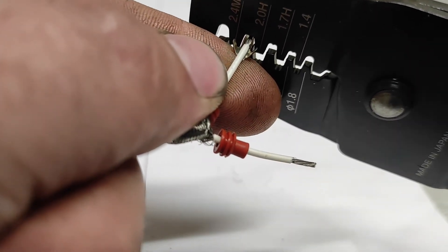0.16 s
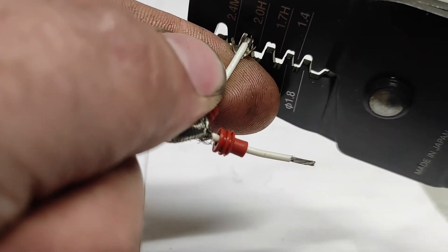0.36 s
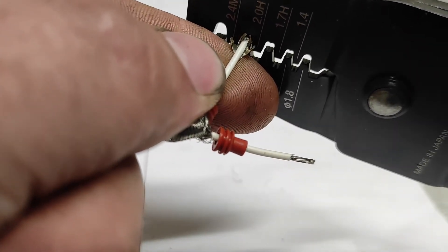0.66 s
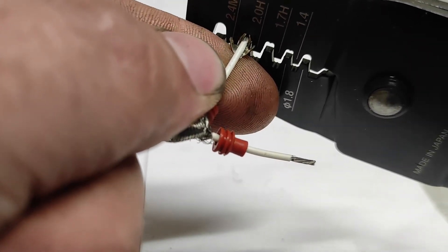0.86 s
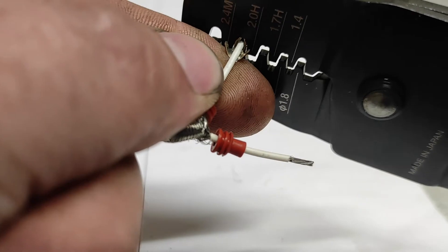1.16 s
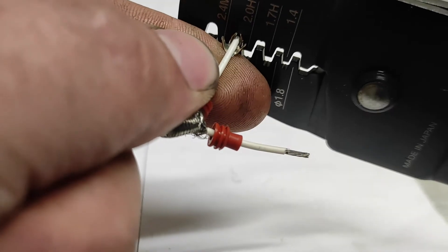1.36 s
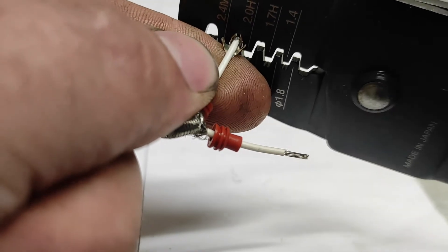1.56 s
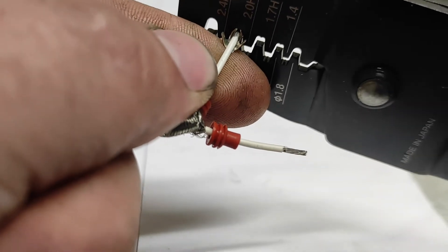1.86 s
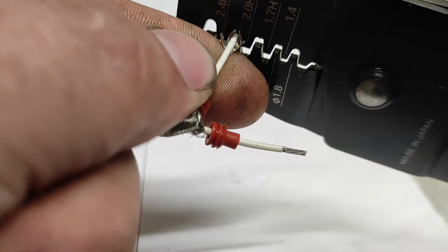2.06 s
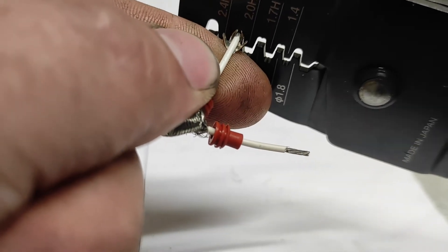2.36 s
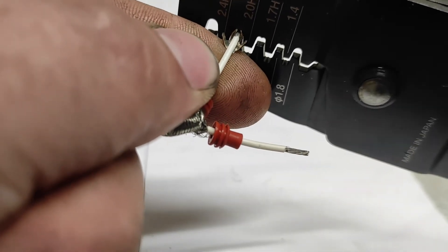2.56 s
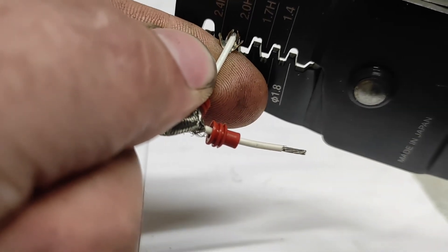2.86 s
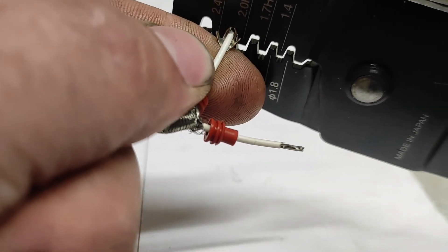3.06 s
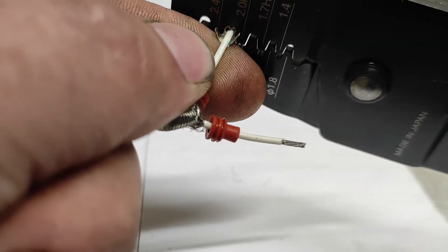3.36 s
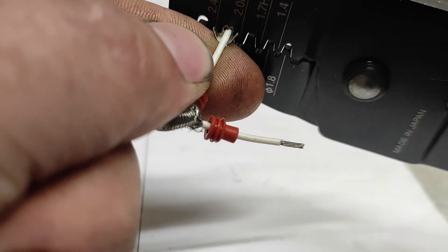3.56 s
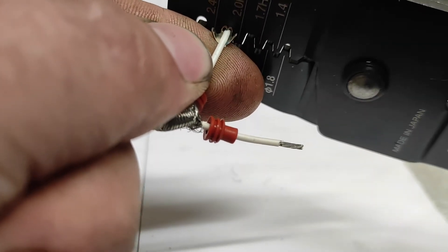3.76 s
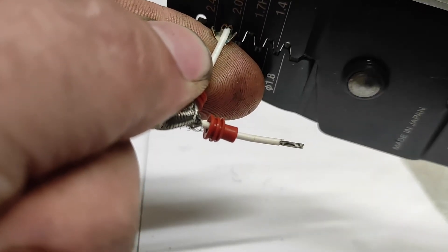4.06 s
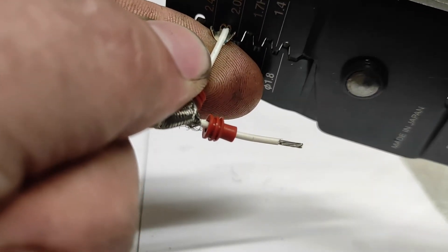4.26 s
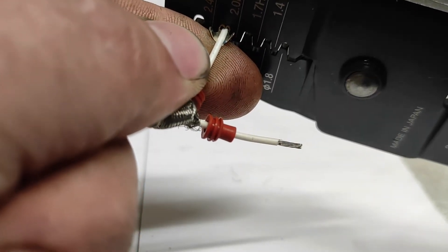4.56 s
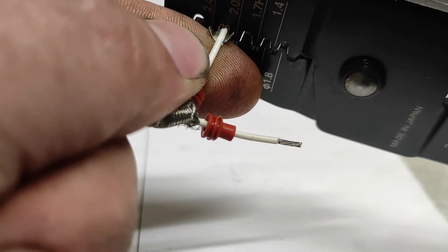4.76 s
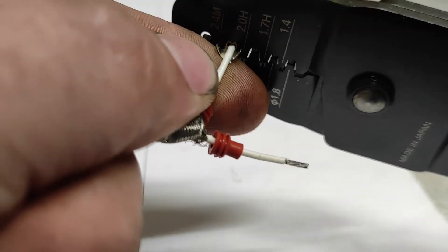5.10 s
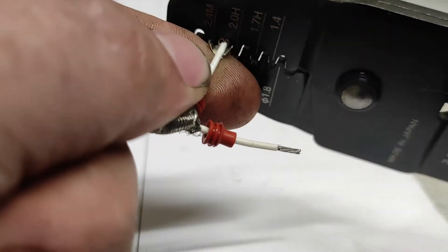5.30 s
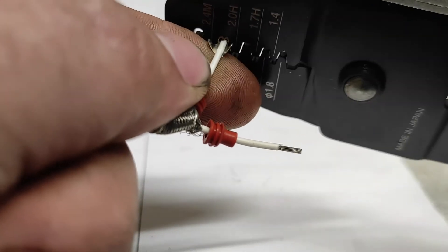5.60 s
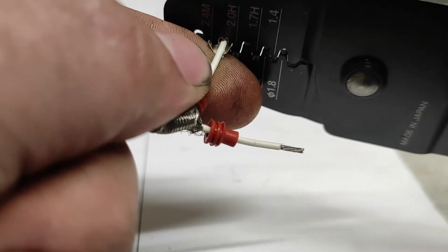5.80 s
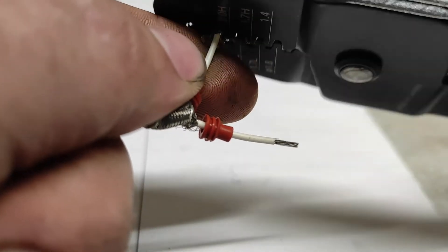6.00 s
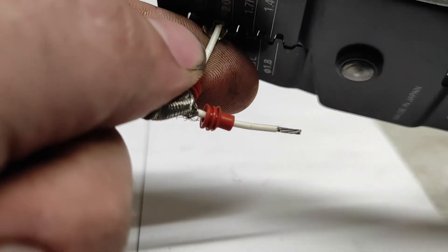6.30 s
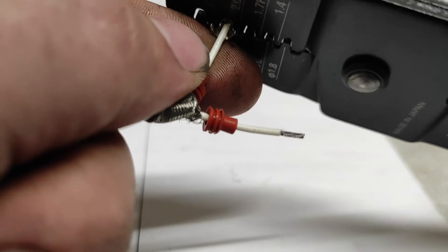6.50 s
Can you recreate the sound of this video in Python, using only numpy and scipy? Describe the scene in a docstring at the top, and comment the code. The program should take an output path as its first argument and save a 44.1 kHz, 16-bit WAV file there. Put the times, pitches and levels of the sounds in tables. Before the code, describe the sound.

A crimping tool squeezed in the fingers near a stereo microphone resting on the bench: light metallic clicking, a single dominant sharp crack with a dull knock mostly at left, near stillness, then rapid clicks and dry skin scuffs on steel. The room tail is short. Faint mains hum, low rumble and a wavering engine-like drone grow slightly underneath.

```python
"""Crimping tool on a workshop bench

Close up: a hand crimping tool ticks, snaps shut on a wire terminal and shifts in the fingers. Each contact is a
short noise burst that rings decaying modes of jaws, pivot, handle and bench and wakes the small room.
Harder blows thump through the bench, mostly into the left microphone; skin and steel rub as shaped noise.
Behind: mains hum and a wavering drone as sines, distant traffic, rumble and hiss as noise.
The camera stands on the bench; each of its two microphone ports has its own resonance."""
import sys
import numpy as np
from scipy import signal
from scipy.fft import rfft, irfft, next_fast_len
from scipy.io import wavfile
from scipy.ndimage import map_coordinates

SR = 44100
rng = np.random.default_rng(int(sys.argv[2]) if len(sys.argv) > 2 else 0)


def digitize_waveform(pressure):
    """Quantize a signal to 16-bit integers and store it at the path in sys.argv[1].

    Rows of a 2-D input are taken as channels; values are limited to [-1, 1].
    """
    field = np.atleast_2d(pressure).T
    bounded = np.clip(field, -1, 1)
    quanta = np.round(bounded * 32767).astype(np.int16)
    wavfile.write(sys.argv[1], SR, quanta)


N = 292824
T = np.arange(N) / SR

# Contacts of the tool: (time [s], strength [dB], then relative to the strength: jaws [dB], pivot [dB],
# extra on the pinging plate [dB], handle knock [dB], extra on the handle's lowest mode as the grip
# lets it ring [dB], blow into the bench [dB]; last, left above right [dB])
CONTACTS = [(0.3321, -52.5, -3, -3, 14, 0, 4.5, -4, 3), (0.408, -41, -9, -9.5, -1, -11.5, -5, -4.5, 0.5),
            (0.8641, -35, -34, -21.5, 3, -8, 1, -15.5, 3.5),
            (1.0621, -36, -10.5, -9.5, -7, -5, 4, -15, -7.5), (1.1368, -47, -14, -15, 0, -7.5, 3, -6, -1),
            (1.1731, -43.5, -8.5, -7.5, 6, 0, 3, -9.5, -4), (1.214, -48, -10.5, -8, 0, -5.5, -1, -28, 5),
            (1.256, -60, -6, -11, 2, 3.5, 7, 1.5, 2), (1.3278, -46.5, -14, -13, 8, -16.5, 2, -13, 1),
            (1.439, -66, -12, -10, 0, 9.5, 4, 12, 2), (1.547, -35, -11.5, -9.5, -6, -34, -3, -26.5, -6),
            (1.8684, -55.5, -6, -4, 6, 0.5, 5, 0.5, 6), (2.2596, -52.5, -15, -20, 2, -23, 0, -17, -4),
            (2.5437, -53, -9, -7, 5, -18, -9, -6.5, 2), (3.13, -12, 0.5, -2.5, 3, -15.5, -4.5, -15.5, 2.5),
            (3.225, -55, 4, -10, -3, 7, -6, 9.5, 0), (3.2916, -39.5, -30.5, -17.5, -0.5, -14, 5, -8, 2),
            (3.536, -55, -5, 2, 5.5, -3, -5, -3, -3), (3.595, -62, -4, 1, 10, -21, -3, -14, 0.5),
            (3.8044, -45.5, -8.5, -10, 7, -2.5, -7, -14, -4),
            (4.1371, -49.5, -2.5, 2, 9.5, 3.5, -5, -14, -0.5),
            (4.26, -45.5, -8.5, -6, 8, -19.5, 4, -15, -1),
            (5.0675, -43, -14, -13.5, 3, -15.5, -5.5, -15.5, 1.5),
            (5.095, -50, -12.5, -6, 6, -17, -5, -20, -2), (5.184, -49.5, -12, -9, 0, -11, 3, -8, 2),
            (5.212, -49, -12, -6, -2, -23, -3, -30, -3), (5.2914, -34.5, -10.5, -11.5, 3, -17, -1, -38, -6),
            (5.3263, -25, -4, -2, 6, -20, -3, -24, 0.5), (5.434, -40, -31, -13.5, 5, -25, 1, -20, -2.5),
            (5.541, -43, -6, -5, 8, -20, -1, -24, -2), (5.5502, -38, -33, -25, 0, -36, -3, -35, 13),
            (5.559, -29.5, -14, -40, -5, -27, -12, -45, -9.5), (5.682, -37, -9.5, -9, 5, -27, -8, -29, -2),
            (6.471, -39, -9.5, -11, -0.5, -35, 2, -27, 7.5),
            (6.5777, -21.5, -34.5, -24, -10, -37, 1, -33, 3)]
# Steel jaws, damped by the grip: (frequency [Hz], level [dB], t60 [s])
JAW_MODES = [(3400, -2, .007), (3770, 2, .01), (4260, 1, .009), (4660, 0, .008), (5000, -4, .006),
             (5430, -2, .007), (6400, -8, .009), (6790, -8, .01)]
# Plates at the pivot, the last one pings: (frequency [Hz], level [dB], t60 [s])
PIVOT_MODES = [(1180, 3, .01), (1480, 1, .008), (1750, 0, .007), (2100, -3, .006), (2870, -1, .007),
               (2430, -1, .01)]
# Handle, lowest mode first: (frequency [Hz], level [dB], t60 [s])
HANDLE_MODES = [(391.4, -2, 0.035), (551.6, -6.5, 0.027), (695.5, 1, 0.028), (840, -9.5, 0.013),
                (1084, -6, 0.031), (1435, -10.5, 0.017), (1780, -14.5, 0.02)]
# Bench top, t60 before the blow's strength scales it: (frequency [Hz], level [dB], t60 [s])
BENCH_MODES = [(139.5, -1, 0.14), (160.2, -4, 0.6), (172.6, -3.5, 0.58), (193, -8, .4), (207, -7.5, 0.22),
               (259, -9, 0.25), (290, -13.5, .2), (342, -14.5, 0.59)]
# The whole camera rocks: (frequency [Hz], level [dB], t60 [s])
ROCKING_MODES = [(48.56, 2.5, 0.4), (60, 0, .15)]
# Shallow dips in the click's spectrum: (frequency [Hz], width [Hz], share removed [0-1])
CLICK_DIPS = [(3140, 600, 0.52), (5950, 810, 0.34)]
# Late decay of the room: (frequency [Hz], t60 [s])
ROOM_DECAY = [(200, 0.82), (1000, 0.21), (4000, 0.19), (8000, 0.13), (12000, 0.19)]
# Fingers sliding on the tool: (start [s], length [s], fine hiss [dB], coarse scuff [dB])
STROKES = [(1.195, 0.066, -61, -62.5), (1.343, 0.034, -74, -84), (1.716, 0.042, -76, -73),
           (1.848, 0.078, -63, -67.5), (3.61, 0.037, -72.5, -101), (3.653, 0.063, -83, -60.5),
           (3.68, 0.14, -76, -90), (5.042, 0.034, -66, -74), (5.13, 0.032, -72, -74),
           (5.263, 0.046, -64.5, -65), (5.311, 0.066, -63, -75), (5.482, 0.1, -70.5, -84),
           (5.673, 0.041, -64.5, -78), (5.792, 0.055, -68, -79), (5.916, 0.095, -61, -61),
           (5.997, 0.094, -60, -64), (6.116, 0.13, -68, -73), (6.199, 0.12, -65.5, -60),
           (6.348, 0.15, -66.5, -58.5), (6.479, 0.39, -73, -58)]
# Fine hiss of skin: (frequency [Hz], level per Hz [dB])
SKIN_SPECTRUM = [(1500, -26), (3000, -3.5), (6000, 0.5), (10000, -2.5), (16000, 0)]
# Coarse scuff, coloured by the handle: (frequency [Hz], level per Hz [dB])
SCUFF_SPECTRUM = [(150, -26), (300, 17), (390, 6), (520, 4), (700, 12), (870, 5.5), (1080, 6), (1500, 5.5),
                  (2100, 3.5), (2800, -6.5), (5000, -47), (9000, -62)]
# A vehicle draws near: (time [s], level [dB])
TRAFFIC_COURSE = [(0, -75.5), (1.27, -72), (2.2, -72), (3.3, -67), (4.4, -63), (5.05, -63.5), (5.79, -57.5),
                  (6.2, -53), (6.64, -60.5)]
# Distant traffic: (frequency [Hz], level per Hz [dB])
TRAFFIC_SPECTRUM = [(65, -22.5), (110, -7), (125, -26.5), (150, -0.5), (205, -14.5), (279, -0.5),
                    (381, -10.5), (579, -11), (687, -5.5), (854, -15.5), (1100, -9.5), (3970, -33.5),
                    (4500, -38), (5850, -58.5), (9900, -120)]
# The drone comes in swells: (centre [s], half-width [s], peak level [dB])
DRONE_SWELLS = [(2.9, 0.28, -62), (3.38, 0.16, -58.5), (4.0, 0.28, -56.5), (4.45, 0.23, -55),
                (5.25, 0.44, -55), (5.9, 0.17, -56.5), (6.33, 0.28, -49.5)]
# Low rumble: (frequency [Hz], level per Hz [dB])
RUMBLE_SPECTRUM = [(12, 1), (25, 3), (45, -7), (75, -13), (130, -14), (250, -47.5)]
# Background hiss: (frequency [Hz], level per Hz [dB])
HISS_SPECTRUM = [(120, -31), (200, 17), (1000, 0), (2500, -4.5), (5000, -11), (9000, -24), (10000, -9.5),
                 (12600, -4), (13000, -41), (16000, -44.5)]
# How alike noise is at left and right: (frequency [Hz], correlation [-1 to 1])
LIKENESS = [(60, 0.66), (130, 0.84), (300, 0.78), (700, 0.1), (1400, -0.14), (4000, 0.18)]
# Inlet resonances, left then right: (frequency [Hz], width [Hz], level [dB])
MIC_PORTS = [(8360, 540, 11), (7000, 950, 11)]
# Above the port resonances: (frequency [Hz], level [dB])
PORT_ROLL_OFF = [(9000, 0), (9900, -8.5), (12500, -15.5), (16000, -28)]
# Balance of the microphones: (frequency [Hz], left above right [dB])
LEFT_ABOVE_RIGHT = [(100, 5.5), (400, 5.5), (1300, 3), (2400, 1.5), (4400, -1)]

# Burst of a contact at 0 dB; lighter ones are briefer (exponent per dB)
RISE_S, CONTACT_S, LONGER_PER_DB = 0.002, 0.0051, 0.012
CRACK_DB, ROOM_DB = -6.5, -3.5  # bare crack and room answer, relative to the strength
FAR_KNOCK_DB = -3  # the handle reaches the walls weaker
ROOM_RING_SHARE = 0.4  # share of the steel modes' ring time in the sound fed to the room, for an even tail
ROUGH_DB, BENCH_ROUGH_DB = 4.5, 3  # random level unevenness roughens the ring of handle and bench
TRAVEL_S = 0.002  # the blow travels through hand and bench
SETTLES_PER_DB = 0.02  # lighter blows die sooner in the bench (exponent per dB)
DAMPED_S = 0.21  # the leaning hand then stills the bench
BENCH_WANDER = 0.02  # small random phase wander roughens the bench's ring (share of time)
BENCH_RIGHT_DB = -13  # bench and foot are felt mostly by the port on the bench, the left one
# Camera foot over bench top at a 0 dB blow, its growth [dB per dB of blow], rocking over bench top
THUD_DB, THUD_GROWS, ROCKING_DB = 21.5, 0.37, -5
# The foot is stiffer while pressed hard: its pitch sags as the blow fades
THUD_START_HZ, THUD_END_HZ, THUD_SAG_S = 370, 165, 0.0047
THUD_RISE_S, THUD_S = 0.0022, 0.023
STROKE_RISE, STROKE_FADE = 0.46, 0.87  # shares of a stroke's length
GRAIN_DB = 2  # unevenness of skin on steel
TOP_HZ = 16000  # upper band limit


def tool():
    """Each contact is a short burst that rings jaws, pivot, handle and bench."""
    out = np.zeros((2, N + SR))
    t = np.arange(SR // 12) / SR
    long = np.arange(SR // 3) / SR
    for s, db, jaw_db, pivot_db, ping_db, knock_db, low_db, bench_db, left_db in CONTACTS:
        force = contact(t, CONTACT_S * np.exp(LONGER_PER_DB * db))
        # the room is fed a single impulse with the energy of the contact
        impulse = np.linalg.norm(force[0]) * np.array([t == 0, t == 0])
        plates = [*PIVOT_MODES[:-1], np.add(PIVOT_MODES[-1], [0, ping_db, 0])]
        knock = handle(t, knock_db, low_db)
        click = steel_click(force, t, jaw_db, pivot_db, plates, 1)
        to_walls = steel_click(impulse, t, jaw_db, pivot_db, plates, ROOM_RING_SHARE).mean(axis=0)
        to_walls = to_walls + amp(FAR_KNOCK_DB) * knock
        through_bench = bench(long, db + bench_db)
        heard = out[:, round(s * SR):]
        heard[:, :len(t)] += amp(db) * (click + knock) * amp([[left_db / 2], [-left_db / 2]])
        heard[:, :len(long)] += amp(db + ROOM_DB) * room(to_walls, size=len(long))
        heard[:, :len(long)] += amp(db + bench_db) * through_bench
    return out[:, :N]


def contact(t, length):
    """A short noise burst with an evened spectrum, drawn separately for each port."""
    shape = np.minimum(t / RISE_S, 1) * np.exp(-(t / length) ** 2)
    z = rfft(rng.standard_normal((2, len(t))) * shape)
    even = irfft(z / np.abs(z), len(t)) * np.sqrt(shape)
    return even * np.linalg.norm(shape) / np.linalg.norm(even, axis=1, keepdims=True)


def steel_click(force, t, jaw_db, pivot_db, plates, ring_share):
    """The bare crack of a contact force and the steel that it rings."""
    crack = filtered(force, lambda hz: (1j * hz / (4500 + 1j * hz)) ** 2)
    jaws = np.multiply(JAW_MODES, [1, 1, ring_share])
    plates = np.multiply(plates, [1, 1, ring_share])
    steel = amp(jaw_db) * driven(force, jaws, t) + amp(pivot_db) * driven(force, plates, t)
    # the tool's body shades the right port
    both = amp(CRACK_DB) * crack + steel * amp([[2.5], [-2.5]])
    return filtered(both, click_dips)


def click_dips(f):
    """Shallow resonant dips in the click's spectrum."""
    dips = [1 - min(share, 1) * 1j * f * width / (hz * hz - f * f + 1j * f * width)
            for hz, width, share in CLICK_DIPS]
    return np.prod(dips, axis=0)


def driven(force, modes, t):
    """Modes shaken by a force, with the force's energy at each port; small parts radiate no bass."""
    answer = ring(modes, t, scatter_db=1.5, attack=0.0001)
    x = signal.fftconvolve(force, answer[None], axes=1)[:, :len(t)]
    x = filtered(x, lambda hz: (1j * hz / (0.75 * modes[0][0] + 1j * hz)) ** 2)
    return x * np.linalg.norm(force[0]) / np.linalg.norm(x, axis=1, keepdims=True)


def handle(t, knock_db, low_db):
    """The handle's modes at an uneven level; the grip decides how freely the lowest one rings."""
    gripped = [np.add(HANDLE_MODES[0], [0, low_db, 0]), *HANDLE_MODES[1:]]
    level = amp(knock_db + ROUGH_DB * wobble(260, t))
    return level * ring(gripped, np.maximum(t - 0.0025, 0), scatter_db=1.0, attack=0.0025)


def bench(t, blow_db):
    """A blow reaches the camera as a thud of its foot, the ringing bench top and a rocking body."""
    late = np.maximum(t - TRAVEL_S, 0)
    thud = amp(THUD_DB + THUD_GROWS * blow_db) * foot(late)
    settle = np.exp(SETTLES_PER_DB * (blow_db + 26.0))
    modes = np.multiply(BENCH_MODES, [1, 1, settle])
    rough = amp(BENCH_ROUGH_DB * wobble(45, t))
    stilled = np.exp(-(late / DAMPED_S) ** 4)
    shift = np.cumsum(BENCH_WANDER * wobble(30, t)) / SR * (late > 0)
    top = rough * stilled * ring(modes, late + shift, scatter_db=3.0, attack=0.006)
    rocking = amp(ROCKING_DB) * ring(ROCKING_MODES, late, scatter_db=0.5, attack=0.008)
    return (thud + top) * amp([[0], [BENCH_RIGHT_DB]]) + rocking


def foot(t):
    """The thud of the camera's foot: a few swings of falling pitch."""
    sag = (THUD_START_HZ - THUD_END_HZ) * THUD_SAG_S * (1 - np.exp(-t / THUD_SAG_S))
    turns = (THUD_END_HZ * t + sag) * (1 + 0.11 * rng.standard_normal())  # pitch varies per blow
    return np.sin(2 * np.pi * turns) * (1 - np.exp(-t / THUD_RISE_S)) * np.exp(-(t / THUD_S) ** 2)


def room(x, size):
    """A fresh diffuse tail for each ear: near surfaces die fast, then each frequency at its own speed."""
    hz, t, z = signal.stft(rng.standard_normal((2, size)), SR, nperseg=256)
    near = amp(11.0 - 60 * t / 0.07)
    decay = amp(-60 * t / along(ROOM_DECAY, hz)[:, None]) + near
    tail = signal.istft(z * decay, SR, nperseg=256)[1]
    return signal.fftconvolve(x[None], tail / np.linalg.norm(tail[0]), axes=1)[:, :size]


def fingers():
    """Skin slips over steel in uneven grains; each stroke rises, holds and fades."""
    u = np.array([(T - s) / length for s, length, *_ in STROKES])  # progress through each stroke
    fade = np.exp(-(np.maximum(u - 0.6, 0) / STROKE_FADE) ** 2)
    swell = np.clip(u / STROKE_RISE, 0, 1) * fade
    fine, coarse = amp(np.transpose(STROKES)[2:]) @ swell
    hiss = unit(amp(GRAIN_DB * wobble(300)) * rush(SKIN_SPECTRUM))
    scuff = unit(amp(GRAIN_DB * wobble(90)) * rush(SCUFF_SPECTRUM))
    return fine * hiss + coarse * scuff


def workshop():
    """All that lies behind the tool: traffic, drone, hum, rumble and hiss."""
    rumble = amp(-59.5 + 1.6 * wobble(1.5)) * rush(RUMBLE_SPECTRUM)
    return traffic() + drone() + mains_hum() + rumble + amp(-70.5) * rush(HISS_SPECTRUM)


def traffic():
    """Distant traffic through the walls: shaped noise that swells and flutters slightly."""
    level_db = np.interp(T, *np.transpose(TRAFFIC_COURSE))
    return amp(level_db + 1.0 * wobble(13)) * rush(TRAFFIC_SPECTRUM)


def drone():
    """An engine-like low sine through the walls, wavering in pitch and level."""
    swell = sum(amp(db) * np.exp(-((T - s) / width) ** 2) for s, width, db in DRONE_SWELLS)
    level = swell * amp(2.2 * wobble(3.3))
    hz = 63.5 + 1.2 * wobble(2.7)
    return level * np.sin(2 * np.pi * np.cumsum(hz) / SR)


def mains_hum():
    """A 100 Hz sine, twice the mains frequency, with a slightly unsteady level."""
    return amp(-60.0 + 0.41 * wobble(31)) * np.sin(2 * np.pi * 100 * T)


def amp(db):
    """dB to gain."""
    return 10 ** (np.asarray(db) / 20)


def unit(x):
    """Scaled to rms 1."""
    return x / np.sqrt(np.mean(x ** 2) + 1e-20)


def along(points, hz):
    """(Hz, value) points interpolated on a log axis."""
    f, v = np.transpose(points)
    return np.interp(np.log(hz + 1), np.log(f + 1), v)


def wobble(rate, t=T):
    """A smooth random curve, rate knots a second."""
    return map_coordinates(rng.standard_normal(int(t[-1] * rate) + 4), [t * rate])


def filtered(x, response):
    """x times a complex response of frequency."""
    m = next_fast_len(x.shape[-1] + 8192)
    return irfft(rfft(x, m) * response(np.fft.rfftfreq(m, 1 / SR)), m)[..., :x.shape[-1]]


def rush(spectrum):
    """Stereo noise of rms 1, alike in the bass and nearly unrelated in the treble."""
    def shares(hz):
        turn = np.arccos(np.clip(along(LIKENESS, hz), -1, 1)) / 2
        return amp(along(spectrum, hz)) * [np.cos(turn), np.sin(turn)]
    mid, side = filtered(rng.standard_normal((2, N)), shares)
    return unit(np.array([mid + side, mid - side]))


def ring(modes, t, scatter_db, attack):
    """Decaying modes at randomly scattered strengths, peak 1."""
    hz, db, t60 = np.transpose(modes)[:, :, None]
    db = db + scatter_db * rng.standard_normal(hz.shape)
    x = (amp(db - 60 * t / t60) * np.sin(2 * np.pi * hz * t)).sum(axis=0)
    x = x * (1 - np.exp(-t / attack))
    return x / np.abs(x).max()


def scene():
    """Everything that arrives at the two ports."""
    return tool() + fingers() + workshop()


def port(f, hz, width, db):
    """A Helmholtz inlet: flat below, a peak, then a steep fall."""
    peak = amp(db) * 1j * f * width / (hz * hz - f * f + 1j * f * width)
    return (1 + peak) * amp(along(PORT_ROLL_OFF, f))


def record(dry):
    """Port resonances, a left side stronger in the bass, and the band limit."""
    def response(f):
        tilt = amp(np.outer([0.5, -0.5], along(LEFT_ABOVE_RIGHT, f)))
        return np.array([port(f, *p) for p in MIC_PORTS]) * tilt * (f < TOP_HZ)
    return filtered(dry, response)


dry = scene()
out = record(dry)
digitize_waveform(out)
```